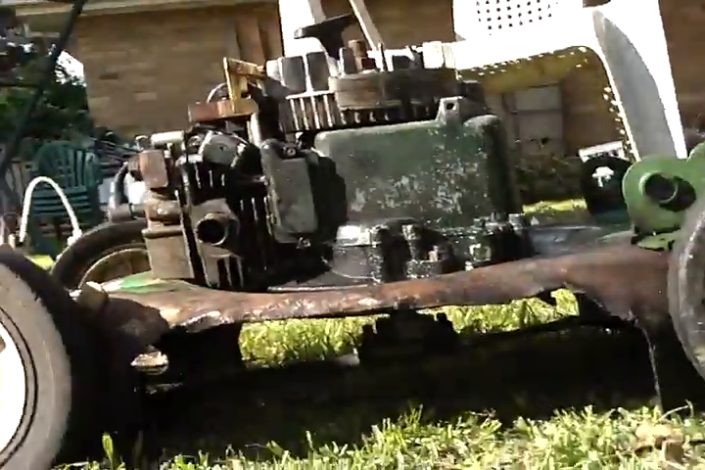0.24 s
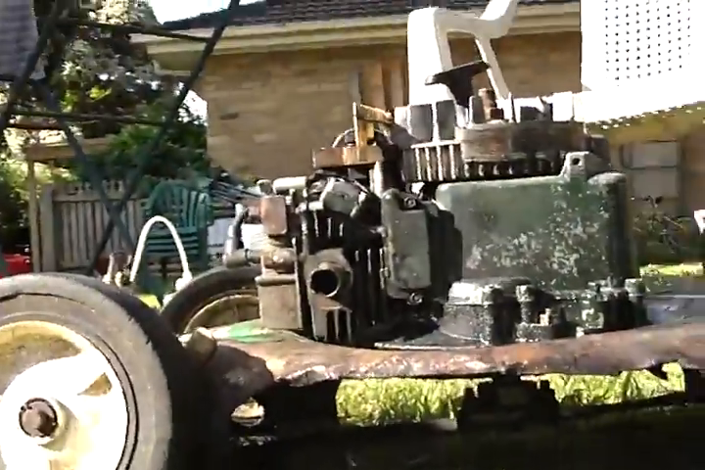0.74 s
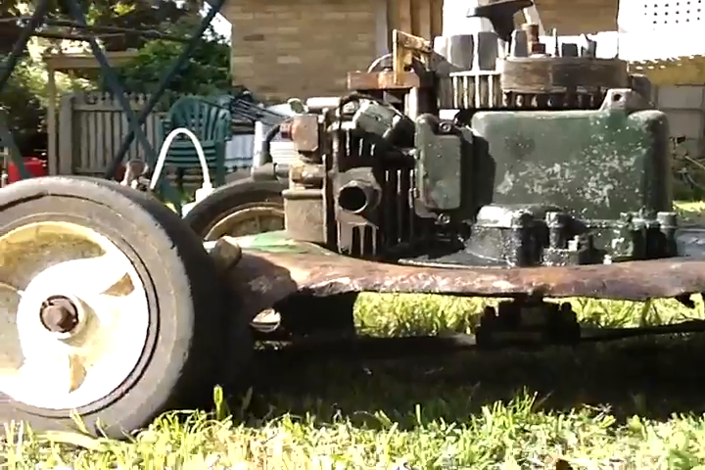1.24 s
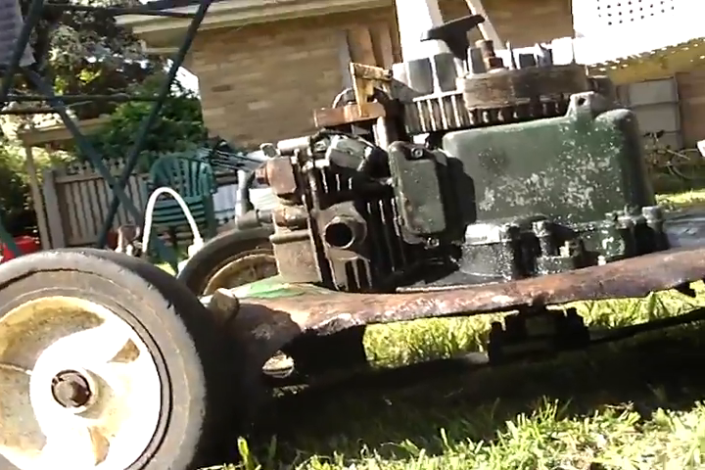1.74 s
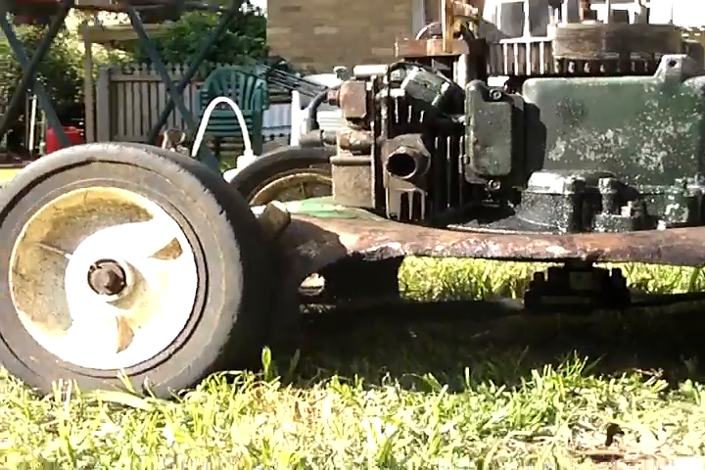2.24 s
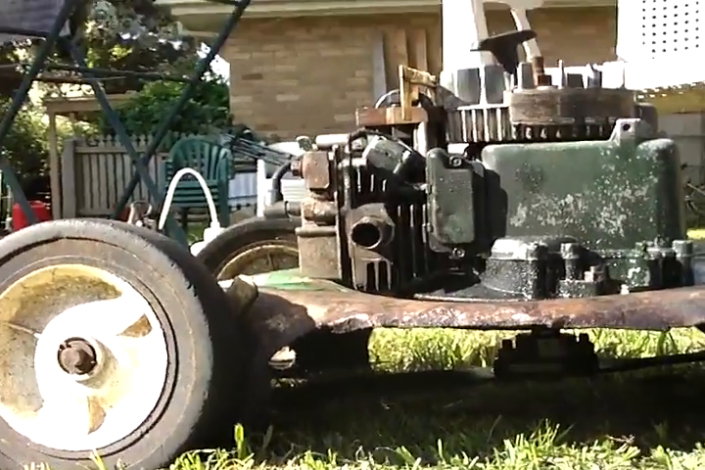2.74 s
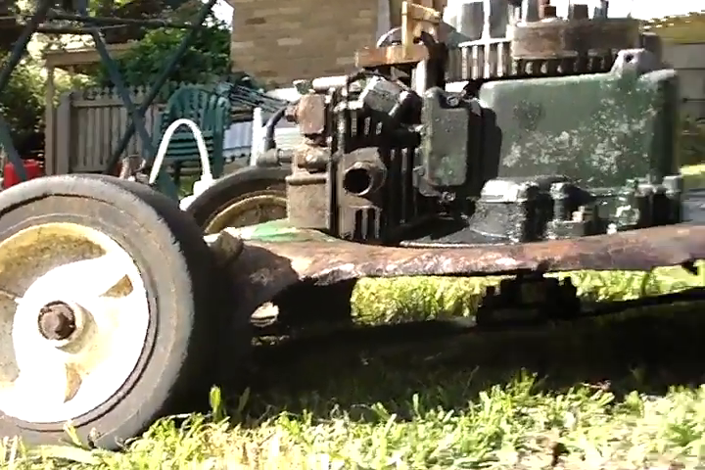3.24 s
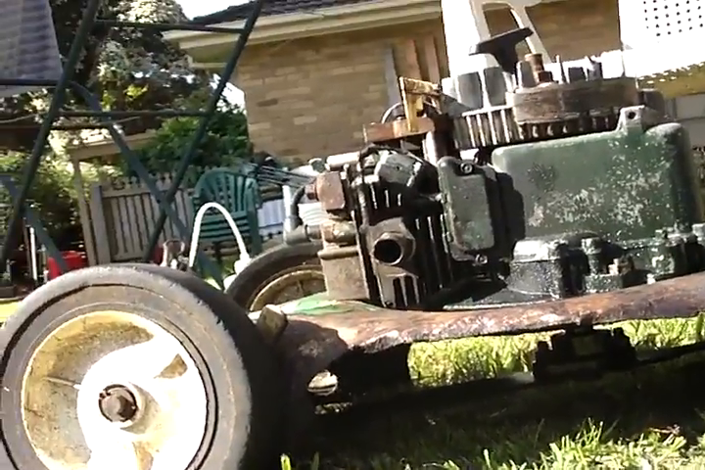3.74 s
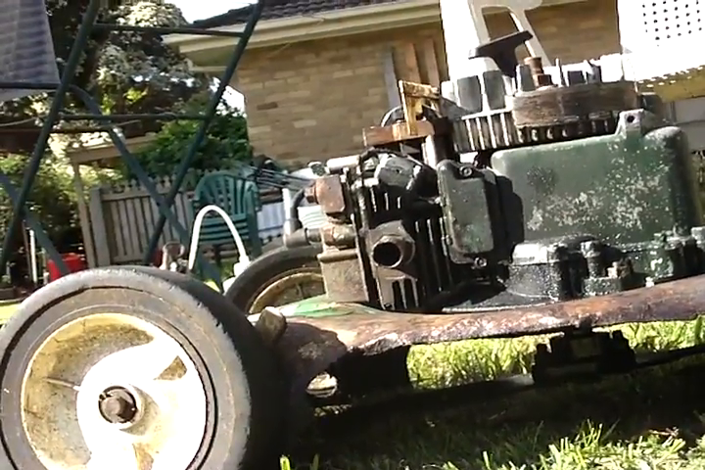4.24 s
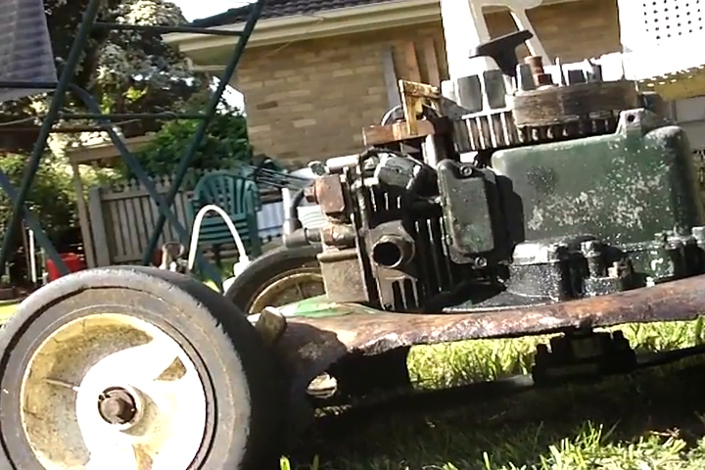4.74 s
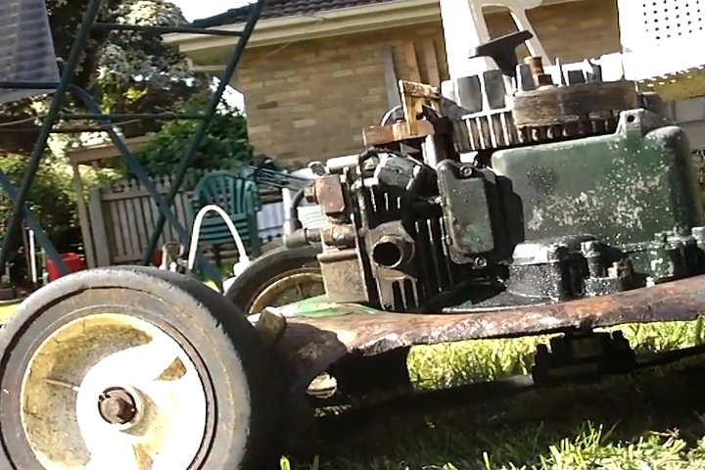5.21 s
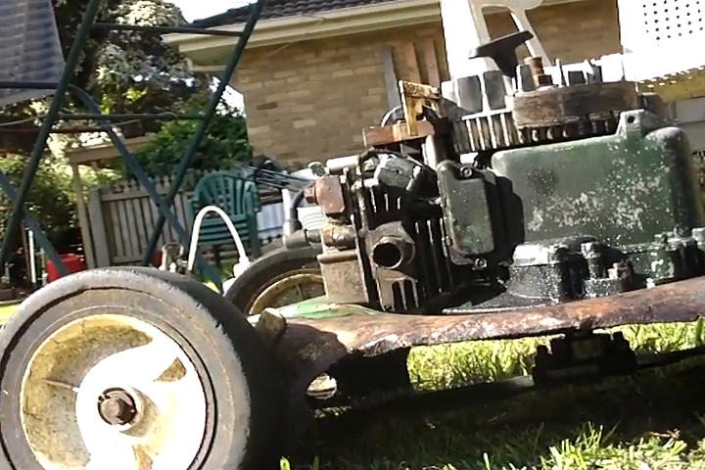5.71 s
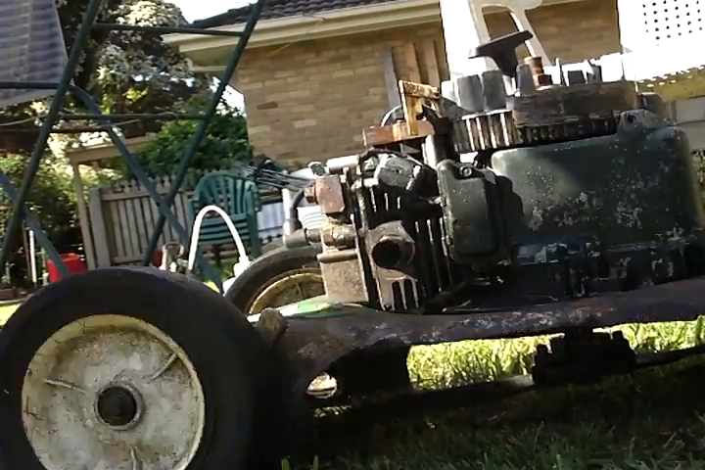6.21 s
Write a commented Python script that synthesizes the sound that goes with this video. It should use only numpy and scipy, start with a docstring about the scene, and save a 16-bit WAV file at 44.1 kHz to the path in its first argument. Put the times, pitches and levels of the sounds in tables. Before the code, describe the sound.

In a back yard, a sharp bump hits a hand-held camera's microphone. An engine drones steadily some way off while a breeze rumbles on the microphone over a soft neighbourhood wash. Birds whistle and chirp with a slight echo, and a few faint hoarse caws come from far away. The camera's plastic casing ticks now and then, and near the end it is gripped, rubbed and lightly knocked.

```python
"""An engine drones some way off and a breeze rumbles on the microphone, over a soft wash and faint hiss.
We are in a back yard, with a hand-held camera low over the grass beside a mower that stands still.
Birds whistle and chirp in echoing glides, and hoarse caws come from far off. A bump near the start
swings the microphone on its mount; the camera's plastic casing ticks as its seams slip in the hand,
and at the end it is gripped, rubbed and lightly knocked."""
import sys
import numpy as np
from scipy import signal
from scipy.fft import rfft, irfft, next_fast_len
from scipy.io import wavfile

SR = 44100
rng = np.random.default_rng(int(sys.argv[2]) if len(sys.argv) > 2 else 0)


def store_wav(level_fs):
    """Save 16-bit WAV to argv[1]."""
    pcm = np.round(np.clip(np.atleast_2d(level_fs), -1, 1) * 32767)
    wavfile.write(sys.argv[1], SR, pcm.T.astype(np.int16))


N = 285327
TIME = np.arange(N) / SR
EDGE_HZ = 7250  # top of the camera's band


def amp(db):
    """Decibels to gain."""
    return 10 ** (np.asarray(db) / 20)


def unit_rms(x):
    """Scales to rms 1."""
    return x / np.sqrt(np.mean(x ** 2) + 1e-20)


def curve(rows):
    """Joins (time [s], value) points into a value for every sample."""
    return np.interp(TIME, *np.transpose(rows))


def decay(t, t60):
    """A tail that falls 60 dB in t60 seconds."""
    return np.exp(-np.log(1000) * t / t60)


def add(mix, start_s, sound):
    """Mixes a sound in at its start time."""
    part = mix[max(round(start_s * SR), 0):][:len(sound)]
    part += sound[:len(part)]


def noise(colour):
    """Noise of rms 1, coloured by (frequency [Hz], relative level [dB]) points."""
    points_hz, db = np.transpose(colour)
    size = next_fast_len(N, True)
    hz = np.fft.rfftfreq(size, 1 / SR)
    gain = amp(np.interp(np.log(hz + 1), np.log(points_hz), db))
    return unit_rms(irfft(rfft(rng.standard_normal(size)) * gain, size)[:N])


def wander(per_s):
    """A random curve of rms 1 that heads for a new value per_s times a second."""
    return unit_rms(np.interp(TIME * per_s, np.arange(4096), rng.standard_normal(4096)))


def resonate(x, hz, width_hz):
    """A resonance with a peak gain of 1."""
    return signal.lfilter(*signal.iirpeak(hz, hz / width_hz, SR), x)


def engine(waver_db=0.96, fade_db=1.95, flutter=0.34, smear_rad=0.1):
    """Harmonics of the firing rate; unequal firings add quarter steps that flutter in the moving air."""
    # the engine's slowly sagging speed: (time [s], firing rate [Hz])
    speed = [(0, 78.7), (1.1, 78.15), (2.1, 78.6), (3.3, 77.7), (6.47, 76.3)]
    # harmonics 1 to 4, as the path to the engine changes: (time [s], level [dB])
    first = [(0, -49.5), (1.7, -48), (3.9, -50.5), (4.8, -42), (6.47, -37.5)]
    second = [(0, -44), (0.619, -41), (.95, -54), (1.95, -46), (2.451, -50.5), (3.25, -43.5), (4.25, -47.5),
              (4.85, -42), (6.47, -47.5)]
    third = [(0, -53.5), (.75, -55.5), (1.6, -66), (2.5, -58), (2.95, -64.5), (3.45, -54.5), (4.2, -68.5),
             (5.6, -51.5), (6.47, -54.5)]
    fourth = [(0, -57), (.75, -56.5), (1.1, -60), (2.8, -72.5), (3.15, -57.5), (3.6, -54.5), (4.2, -63),
              (5.6, -57.5), (6.47, -64)]
    # spectrum of the faint quarter-step lines: (frequency [Hz], level [dB])
    overtones = [(97, -65), (117, -63.5), (140, -75), (215, -76.5), (255, -79.5), (330, -72.5),
                 (370, -85.5), (425, -77), (590, -87), (700, -79), (820, -83.5), (930, -85), (1150, -88.5)]
    firing_hz = curve(speed)
    phase = 2 * np.pi * np.cumsum(firing_hz) / SR
    drone = np.zeros(N)
    harmonics = [(1, curve(first)), (2, curve(second)), (3, curve(third)), (4, curve(fourth)), (6, -67.5)]
    for k, db in harmonics:
        drift_db = waver_db * wander(16) if k <= 2 else fade_db * wander(7)
        drone += amp(db + drift_db) * np.sin(k * phase + 2 * np.pi * rng.random())
    smeared = phase + smear_rad * wander(10)
    for k in np.arange(5, 50) / 4:
        db = np.interp(k * firing_hz.mean(), *np.transpose(overtones))
        drone += amp(db) * (1 + flutter * wander(4.2)) * np.sin(k * smeared + 2 * np.pi * rng.random())
    return np.sqrt(2) * drone  # makes the levels rms


def wind(breeze_db=-52.5, lumps_db=2.5):
    """A breeze on the microphone: lumpy rumble that swells in gusts."""
    # spectrum of the rumble: (frequency [Hz], relative level [dB])
    colour = [(8, -6.5), (25, 5.5), (45, 4), (70, 1), (110, -14.5), (200, -30.5), (400, -26), (900, -71)]
    # gusts on top of the breeze: (middle [s], level [dB], half-width [s])
    gusts = [(.12, -36, .05), (2.04, -43, 0.021), (2.231, -46.5, 0.04), (2.589, -42, .035),
             (3.31, -43.5, 0.04), (4.39, -40, 0.16), (4.88, -41.5, 0.16), (5.42, -46, 0.11),
             (6.041, -42, 0.086)]
    swells = sum(amp(db) * np.exp(-((TIME - middle) / width) ** 2) for middle, db, width in gusts)
    return noise(colour) * (amp(breeze_db) + swells) * amp(lumps_db * wander(25))


def wash(lift_db=2, swell_db=1.54):
    """The distant neighbourhood blends into a smooth bed of noise."""
    # spectrum of the bed: (frequency [Hz], relative level [dB])
    colour = [(60, 14.5), (150, 12), (280, 11), (400, 4), (560, 2.5), (720, -0.5), (810, -5), (950, 0.5),
              (1400, 1.5), (2000, -5.5), (2800, -7), (4000, -27.5), (7000, -49)]
    # its slow rise and fall: (time [s], level before the lift [dB])
    levels = [(0, -49), (.5, -52.5), (1.5, -57.5), (3.15, -57.5), (3.5, -55.5), (4.23, -62.5), (4.8, -57),
              (5.5, -51.5), (6.47, -52)]
    return noise(colour) * amp(lift_db + curve(levels) + swell_db * wander(28))


def hiss(flicker_db=1.5):
    """A faint, flickering high hiss that swells into a rustle as the camera is handled at the end."""
    # spectrum of the hiss: (frequency [Hz], relative level [dB])
    colour = [(500, -30.5), (1500, 10), (2800, 7), (3800, 7), (4800, 2), (5800, -4.5), (6800, -19.5),
              (7600, -15.5)]
    # its slow rise and fall: (time [s], level [dB])
    levels = [(0, -64), (.8, -67), (1.6, -70.5), (2.8, -71), (4.2, -72), (4.95, -63), (5.6, -62),
              (6.05, -54.5), (6.35, -66)]
    return noise(colour) * amp(curve(levels) + flicker_db * wander(98))


def caws(throat_hz=1220, width_hz=300):
    """Hoarse calls, perhaps a crow's; distance leaves only the main throat resonance."""
    # far-off calls: (middle [s], level [dB], length [s])
    calls = [(.02, -48.5, 0.04), (1.284, -59, 0.19), (2.324, -58, .16)]
    rasp = resonate(rng.standard_normal(N), throat_hz, width_hz)
    rasp = unit_rms(resonate(rasp, throat_hz, width_hz))
    return rasp * sum(amp(db) * np.exp(-(2 * (TIME - middle) / length) ** 2) for middle, db, length in calls)


def bumps(mount_hz=27, damping=0.36, shudder_db=-33, shudder_t60=0.18):
    """Each blow is a smooth push; the microphone swings back on its mount and the body shudders."""
    # soft blows on the camera body: (time [s], peak push [dB], contact time [s])
    blows = [(0.0693, 0.1, .005), (0.0855, -8.5, 0.0066), (5.253, -19.5, 0.0024), (5.2638, -21.5, 0.0031),
             (5.2974, -23, 0.0015), (5.3905, -21.5, 0.0013), (5.421, -27.5, 0.0017), (6.234, -17, 0.0027),
             (6.2465, -20, 0.0015), (6.2498, -17.5, 0.0019)]
    force = np.zeros(N)
    for start, db, contact in blows:
        progress = np.arange(0, 1, 1 / (contact * SR))
        add(force, start, amp(db) * np.sin(np.pi * progress) ** 2)
    omega = 2 * np.pi * mount_hz
    swing = signal.lfilter(*signal.bilinear([1, 0, 0], [1, damping * omega, omega ** 2], SR), force)
    t = TIME[:SR // 4]
    body = noise([(40, -25), (120, -3), (300, -7), (600, -1), (1500, -17), (5000, -49)])
    shudder = body[:len(t)] * decay(t, shudder_t60)
    return swing + amp(shudder_db) * signal.fftconvolve(force, shudder / np.linalg.norm(shudder))[:N]


def casing(bass_db, treble_db, panel=()):
    """Ring of the plastic shell and the panel touched; the contact tilts bass and treble (dB an octave)."""
    # resonances of the shell: (frequency [Hz], width [Hz], lift [dB])
    shell = [(764, 1300, 7.5), (1110, 540, -2), (1270, 140, 3), (1670, 140, 2), (2724, 1500, 6.5),
             (3500, 580, -2), (4065, 2600, 10)]
    size = 2048
    hz = np.maximum(abs(np.fft.fftfreq(size, 1 / SR)), 20)
    db = sum(lift / (1 + (2 * (hz - centre) / width) ** 2) for centre, width, lift in [*shell, *panel])
    db += bass_db * np.log2(1100 / np.clip(hz, 350, 1100))
    db += treble_db * np.log2(np.clip(hz, 1700, EDGE_HZ) / 1700)
    db -= 14 * np.log2(np.maximum(300 / hz, 1))  # low cut
    db -= 60 * np.log2(np.maximum(hz / EDGE_HZ, 1))  # high cut
    log_gain = np.log(amp(np.maximum(db, -90)))
    spectrum = np.exp(np.conj(signal.hilbert(log_gain)))  # minimum phase: sharp start, then the ring
    return np.fft.ifft(spectrum).real[:size // 2]


def ticks(panel_db=8, panel_width_hz=380, chatter=0.13, echo_db=-21, echo_t60=0.09):
    """A seam of the casing slips, chatters and echoes off the mower deck."""
    # seam slips: (time [s], attack level [dB], panel ring [Hz], sharpness [0-1], chatter T60 [s])
    slips = [(0.0694, -22.5, 1500, 0.3, 0.018), (0.0791, -31.5, 2650, 0.29, 0.016),
             (0.3317, -42.5, 1080, 0.14, 0.016), (0.7387, -41.5, 1166, 0.42, 0.023),
             (1.2515, -42, 1130, .05, 0.036), (1.3773, -51.5, 3460, 0.87, 0.011),
             (1.5169, -33, 1380, 0.65, 0.019), (1.9658, -49.5, 930, 0.28, .013),
             (2.016, -49.5, 1294, 0.44, 0.017), (2.2006, -51, 2420, 0.62, 0.045),
             (2.5654, -38, 1300, 0.05, 0.03), (2.608, -45.5, 950, 0.1, 0.019),
             (3.2934, -40, 1200, 0.2, 0.03), (3.3121, -50, 2920, .55, 0.0072),
             (3.7415, -54, 1660, 0.3, 0.035), (3.86, -56, 1690, .35, .022), (4.1133, -42.5, 1110, 0, 0.019),
             (5.2575, -38.5, 790, 0.7, 0.091), (5.2957, -41, 765, 0.36, 0.042),
             (5.311, -34.5, 1940, 0.52, 0.041), (5.3907, -52, 710, 0.54, 0.017),
             (5.4271, -41.5, 1230, 0.62, 0.0066), (5.4873, -40.5, 2500, 0.61, 0.035),
             (5.5601, -32.5, 1780, 0.52, 0.0067), (5.5974, -39, 2520, 0.75, 0.015),
             (5.6247, -45, 4330, 0.82, 0.02), (5.7642, -45, 6260, 1, 0.028),
             (5.8125, -29.5, 880, 0.03, 0.029), (5.8238, -45.5, 2500, 0.86, 0.027),
             (5.9383, -40.5, 2400, .7, 0.013), (5.972, -41, 2030, .6, 0.01),
             (6.2186, -40, 720, 0.72, 0.066), (6.2429, -40, 1780, 0.79, 0.05),
             (6.2513, -27.5, 1710, 0.52, 0.036), (6.3582, -52, 930, 0, .021)]
    out, t = np.zeros(N), TIME[:SR // 10]
    attack = round(0.008 * SR)
    light_db, firm_range_db = -47, 16  # a dull tick is light up to this level, firm this much above it
    for start, db, panel_hz, sharpness, chatter_t60 in [*slips, *creaks()]:
        firmness = np.clip(sharpness + (db - light_db) / firm_range_db, 0, 1)
        bass_db = np.interp(firmness, [0, 1], [-18.5, 5])  # firm slips are fuller
        treble_db = np.interp(sharpness, [0, 1], [-33, 4.5])  # sharp slips are brighter
        tail = decay(t, chatter_t60) + amp(echo_db) * decay(t, echo_t60)
        force = chatter * rng.standard_normal(len(t)) * tail
        force[0] = 1  # the slip itself
        ring = casing(bass_db, treble_db, [(panel_hz, panel_width_hz, panel_db)])
        tick = signal.fftconvolve(force, ring)
        add(out, start, amp(db) * tick / tick[:attack].std())
    return out


def rubs(grain_db=3, slips_per_s=7000, clump_db=0.5, relative_width=0.71):
    """Fingers and sleeve rub the casing: clumps of tiny uneven slips, in strokes that swell and fade."""
    # rubbing strokes: (middle [s], peak level [dB], length [s], centre of brightness [Hz])
    strokes = [(0.0726, -30, 0.0075, 900), (0.1, -42, 0.032, 700), (0.268, -57.5, 0.13, 4680),
               (0.486, -55, 0.14, 2970), (0.846, -60, 0.19, 2600), (1.107, -63, 0.074, 4150),
               (2.186, -52.5, 0.034, 1405), (2.583, -55.5, 0.059, 1210), (3.355, -56.5, 0.072, 1998),
               (3.55, -62.5, 0.5, 600), (5.11, -53.5, 0.11, 2160), (5.253, -48, 0.047, 910),
               (5.42, -42.5, 0.045, 900), (5.499, -46, 0.031, 1320), (5.542, -48.5, 0.054, 800),
               (5.598, -42.5, 0.049, 2740), (5.65, -62, 0.98, 5400), (5.81, -36.5, 0.022, 800),
               (5.969, -43, 0.081, 1700), (6.05, -38, 0.078, 880), (6.241, -38.5, 0.038, 760),
               (6.47, -32, 0.033, 1171)]
    out = np.zeros(N)
    size_db = grain_db * np.minimum(rng.exponential(1, N), 3) + clump_db * wander(230)
    slips = rng.standard_normal(N) * amp(size_db) * (rng.random(N) < slips_per_s / SR)
    friction = signal.oaconvolve(slips, casing(bass_db=-1, treble_db=-7))
    for middle, db, length, centre_hz in strokes:
        count = int(length * SR)
        stroke = np.take(friction, np.arange(count) + int(middle * SR), mode="wrap")
        stroke = resonate(stroke, centre_hz, centre_hz * relative_width)
        add(out, middle - length / 2, amp(db) * unit_rms(stroke) * np.hanning(count))
    return out


def birds(ease=1.8, quaver=0.017, chirp_s=0.035, sway=0.008):
    """Each note glides quickly, then levels off; long whistles sway a little and short chirps quaver."""
    # whistles and chirps: (time [s], length [s], level [dB], first pitch [Hz], last pitch [Hz])
    notes = [(1.37, 0.037, -62, 3300, 3710), (1.519, 0.22, -60, 2053, 2630),
             (2.017, 0.16, -56.5, 2080, 2090), (2.094, 0.17, -52.5, 2423, 2383),
             (2.275, 0.18, -50, 2233, 2171), (2.629, 0.044, -56, 3000, 4000),
             (2.692, .039, -63, 3220, 3370), (2.724, .048, -52.5, 2600, 2187),
             (2.838, 0.016, -62, 4200, 4300), (2.861, 0.028, -59.5, 3870, 2930),
             (2.884, 0.1, -60, 2050, 2250), (2.971, 0.059, -59.5, 2710, 3010),
             (2.987, 0.07, -54.5, 2130, 2333), (3.9, 0.078, -64.5, 3550, 2760),
             (4.288, 0.063, -62, 3180, 2780), (4.854, .035, -59, 2540, 2730),
             (5.84, 0.056, -62, 2450, 2510), (6.112, .07, -58.5, 2480, 2340)]
    song = np.zeros(N)
    tremble, drift = wander(400), 1 + sway * wander(45)
    for start, length, db, first_hz, last_hz in notes:
        count = int(length * SR)
        span = int(start * SR) + np.arange(count)
        glide_hz = last_hz + (first_hz - last_hz) * np.linspace(1, 0, count) ** ease
        depth = quaver * min(chirp_s / length, 1)
        hz = glide_hz * drift[span] * (1 + depth * tremble[span])
        whistle = np.sin(2 * np.pi * np.cumsum(hz) / SR)
        add(song, start, amp(db) * signal.windows.tukey(count, 0.5) * whistle)
    return song


def yard_echo(sound, echo_db=-6, t60=0.28, echoes_per_s=1500, predelay_s=0.006):
    """Adds the scattered reflections that the house wall and the fence throw back."""
    t = TIME[:SR // 2]
    taps = rng.standard_normal(len(t)) * (rng.random(len(t)) < echoes_per_s / SR)
    taps *= (t > predelay_s) * decay(t, t60)
    return sound + amp(echo_db) * signal.fftconvolve(sound, taps / np.linalg.norm(taps))[:N]


def creaks(start_s=5.25, end_s=5.9, per_s=20, db=-52, panel_hz=2400, sharpness=0.63, chatter_t60=0.015):
    """The tightening hand sets off small slips at random, as extra rows for ticks()."""
    spread_db, spread_octaves = 3, 0.5
    grip_s = end_s - start_s
    draws = rng.uniform(-1, 1, (round(per_s * grip_s), 3))
    return [(start_s + grip_s * abs(when), db + spread_db * size,
             panel_hz * 2 ** (spread_octaves * pitch), sharpness, chatter_t60)
            for when, size, pitch in draws]


def scene():
    """The yard and the handling of the camera, in mono."""
    ambience = engine() + wind() + wash() + hiss() + yard_echo(birds()) + caws()
    handling = bumps() + rubs() + ticks()
    return (ambience + handling)[None]


def record(dry, ceiling=0.98):
    """The microphone rounds off the loudest push; the camera's narrow band cuts the top treble."""
    rounded = dry / (1 + (dry / ceiling) ** 8) ** (1 / 8)
    high_cut = signal.firwin(255, EDGE_HZ, window=("kaiser", 8), fs=SR)
    return signal.oaconvolve(rounded, high_cut[None], "same")


dry = scene()
out = record(dry)
store_wav(out)
```